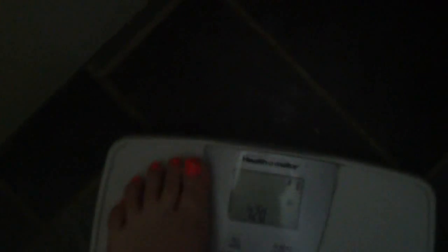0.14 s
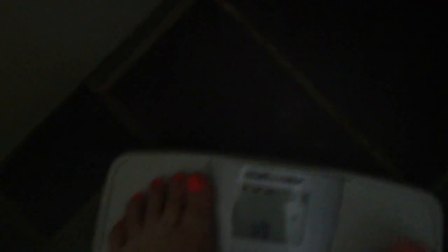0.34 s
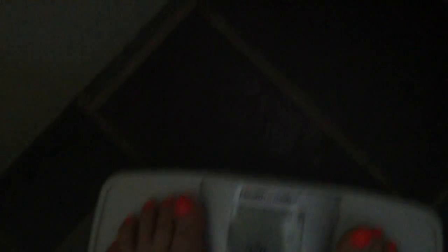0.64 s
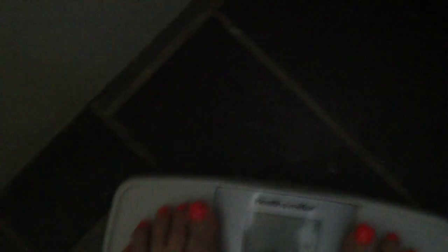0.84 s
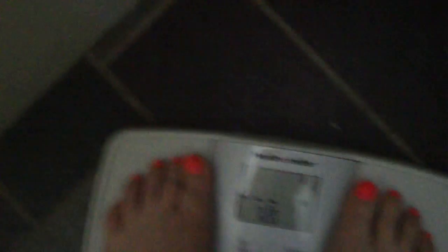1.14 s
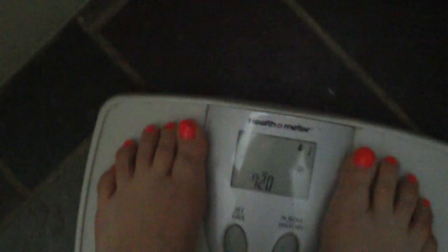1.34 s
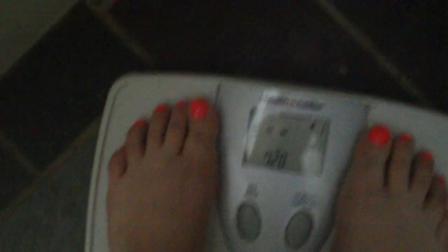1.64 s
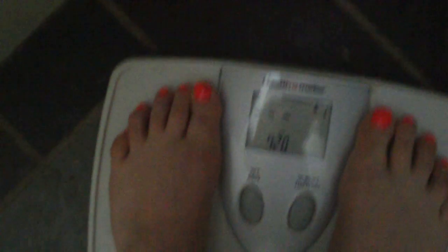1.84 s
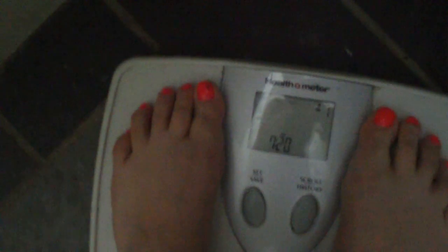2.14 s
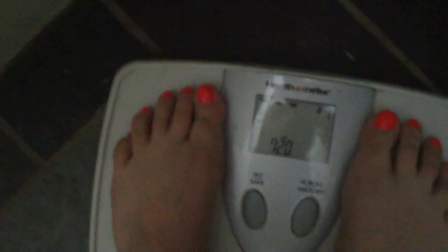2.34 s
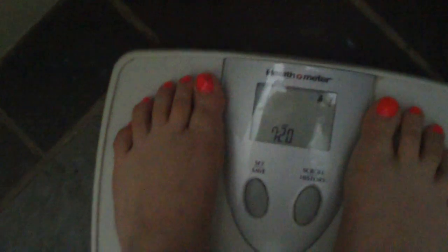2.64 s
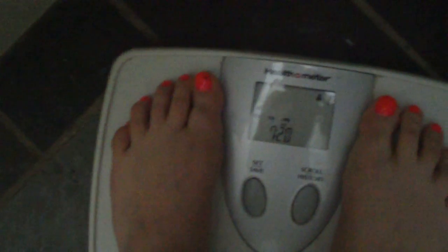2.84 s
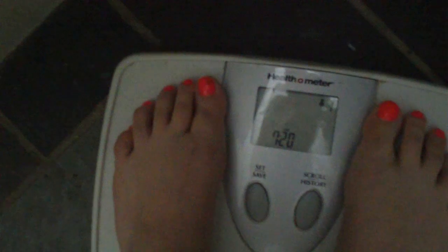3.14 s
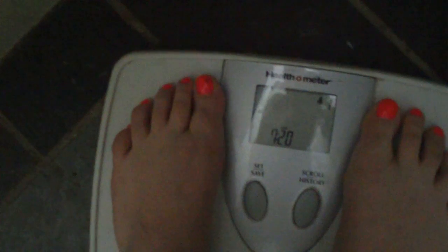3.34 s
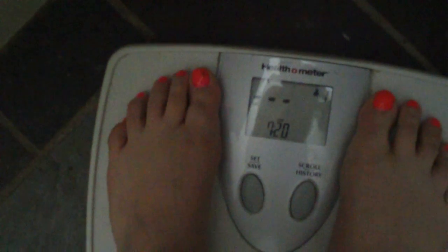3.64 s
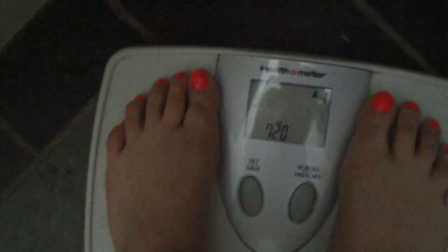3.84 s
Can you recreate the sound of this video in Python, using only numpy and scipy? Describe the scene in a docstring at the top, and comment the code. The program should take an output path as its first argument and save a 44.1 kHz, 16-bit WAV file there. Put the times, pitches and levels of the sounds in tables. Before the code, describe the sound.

A plastic bathroom scale on tiles clunks and clicks as bare feet step on: dull heel thuds at the start, a dense rattle from 0.2 to 0.45 s, a short sole scuff near 0.6, separate clicks around 0.85 and 1.0, loudest clacks at 1.2. A soft thud follows at 1.9, then barely audible blips at 2.8 and 3.5 over steady hiss, faint hum and thin electronic buzz, with short hard-room echo.

```python
"""Throughout: a quiet hard room; a handheld camera adds noise hiss, hand rumble, sine whistles, chatter. 0 to
1.3 s: bare feet step onto a plastic bathroom scale on tiles. Noise bursts ring the platform's modes as clicks
and clunks, grainy noise swells as the soles scuff, sagging sines are heel thuds. 1.9 s: a last thud. 2.8 and
3.5 s: faint short sine tones. Sparse random taps echo the steps, thuds and tones, but not the background."""
import sys
import numpy as np
from scipy import signal
from scipy.fft import rfft, irfft
from scipy.io import wavfile
from scipy.ndimage import uniform_filter1d

SR = 44100
rng = np.random.default_rng(int(sys.argv[2]) if len(sys.argv) > 2 else 0)


def store_wav(level_fs):
    """Save 16-bit WAV to argv[1]."""
    pcm = np.round(np.clip(np.atleast_2d(level_fs), -1, 1) * 32767)
    wavfile.write(sys.argv[1], SR, pcm.T.astype(np.int16))


def undo_db(level):
    """Turn decibels back into plain size, where 20 dB means ten times bigger."""
    steps = np.asarray(level, float) / 20
    return 10 ** steps


N = 176400

# hiss common to both channels, shape only: f/Hz, density/dB per Hz
HISS_SPECTRUM = [(25, -1), (40, -5), (108, -13), (399, -9), (467, -16), (2990, -27), (6540, -34),
                 (8000, -30.5), (12700, -28), (13100, -33.5), (15500, -51)]
# very faint side noise, opposite in the two channels, shape only: f/Hz, density/dB per Hz
SIDE_SPECTRUM = [(20, -5), (100, -8.5), (200, -44), (650, -41), (1900, -35.5), (7200, -34.5), (8000, -38),
                 (10000, -54), (12000, -33.5), (15000, -43)]
HISS_RMS_DB, SIDE_RMS_DB, PATCH_RMS_DB = -53, -65.5, 1.5
# hums of the room: f/Hz, width/Hz, rms level/dB
HUMS = [(143.4, 19, -67.5), (320.6, 41, -62), (406, 17, -67), (727, 18, -71.5), (821, 46, -66.5),
        (7803, 320, -71.5)]
# steady whistles: f/Hz, rms level/dB
WHISTLES = [(7867, -67), (14980, -82)]
RUMBLE_HZ, RUMBLE_WIDTH_HZ, RUMBLE_RMS_DB = 13, 12, -51

# periodic circuit tasks: rate/Hz, first start t/s
TASKS = [(100.012, .0035), (46.863, .0150), (14.989, .0050), (14.989, .0185), (29.97, .0180)]
# load burst of each task in turn: length/s, level before random spread/dB
TASK_BURSTS = [(0.0014, 17), (0.011, 12), (0.0034, 14), (0.0052, 1), (0.0018, 18)]
# resonances that colour the chatter: f/Hz, width/Hz, relative level/dB
CHATTER_MODES = [(5140, 410, -4), (8790, 230, 4), (9800, 1470, 1.5), (10420, 720, 3.5), (10950, 270, -0.5)]
TICK_HZ, TICK_DB, IDLE_DB, CHATTER_RMS_DB = 1000, 1, -1, -58

# decay of the room: f/Hz, t60/s
ROOM_T60 = [(530, 0.63), (1390, 0.43), (3680, 0.27), (9700, 0.24)]
ROOM_DB, ROOM_TURN_S = -10, 0.04954

# faint short tones: t/s, level/dB, f/Hz, t60/s
CHIRPS = [(2.845, -56, 5750, .08), (3.508, -59, 2950, .45)]
# heel thuds through the floor: t/s, level/dB, final f/Hz, t60/s
THUDS = [(0.066, -34, 65, 0.21), (0.075, -29, 177.4, 0.095), (.088, -35.5, 86.3, .15),
         (0.103, -32, 132, 0.11), (0.665, -32.5, 143, 0.11), (1.932, -33.5, 61, 0.049)]
THUD_DROP = 0.26  # share by which the pitch starts high

# soles sliding: three corner times of the swell t/s (the last row's are out of order),
# hiss level/dB, platform body level/dB
SCUFFS = [(0.055, 0.06, .13, -46, -60), (.19, 0.278, 0.54, -58, -57), (0.386, 0.465, 0.58, -42, -50.5),
          (0.54, 0.579, 0.63, -38, -57), (.64, 0.712, 1, -59.5, -65), (1.09, 1.073, 1.1, -48, -68)]
# friction hiss, shape only: f/Hz, density/dB per Hz
SCUFF_SPECTRUM = [(700, 4.5), (1500, 8.5), (8800, 2), (13000, 2.5), (15500, -12)]
SCUFF_GRAIN_RMS_DB = 2

# platform clicks: t/s, middle level/dB, bass level/dB, treble level/dB,
# middle and treble rattle t60/s, favoured mode f/Hz
CLICKS = [(0.0, -30, -24, -34.5, 0.03, 2110), (0.045, -31.5, -42, -31, 0.037, 2630),
          (0.187, -29.5, -29, -40, 0.032, 2720), (0.2408, -31.5, -34, -32.5, 0.027, 3460),
          (0.2631, -39, -32.5, -45, 0.048, 2200), (0.2843, -48, -37, -58, 0.035, 2000),
          (0.2992, -29.5, -33.5, -33.5, 0.037, 1900), (0.3354, -28.5, -38, -13, 0.024, 4340),
          (0.356, -27.5, -26, -28, 0.043, 2130), (0.3693, -22.5, -35, -18, 0.032, 2070),
          (0.4342, -35, -38.5, -48, 0.026, 2010), (0.601, -35.5, -33.5, -48, 0.025, 2940),
          (0.633, -53, -46, -47, 0.051, 4000), (0.6655, -70, -32.5, -60, 0.027, 1700),
          (0.728, -44.5, -35.5, -46, 0.036, 3050), (0.737, -39.5, -36, -47, 0.024, 2100),
          (0.851, -23.5, -28.5, -28, 0.03, 2930), (0.984, -31.5, -32.5, -33, 0.029, 2150),
          (0.9901, -32.5, -31, -41, 0.012, 2160), (1.0164, -30, -40, -37, 0.025, 2920),
          (1.0729, -23.5, -38, -21, 0.038, 4750), (1.2054, -17, -24.5, -22, 0.018, 3520),
          (1.2085, -29.5, -28.5, -31, 0.03, 1940), (1.221, -63, -44, -35, 0.038, 1430),
          (1.2317, -21, -26, -22.5, 0.024, 2050)]
# modes of the platform: f/Hz, width/Hz, relative level/dB
BASS_MODES = [(180, 360, -21), (328, 205, 2), (441.4, 61, 3.5), (520, 35, -0.5), (840, 182, -5),
              (1100, 320, -6.5)]
MID_MODES = [(1500, 270, 0.43), (1857, 180, 8.3), (2150, 280, 7.7), (2674, 410, 7.6), (3300, 1030, 6),
             (3950, 690, 6.5)]
TOP_MODES = [(4720, 1470, 0), (6870, 2050, 0), (9030, 2100, 1.5), (11330, 2500, 0), (12850, 2200, -2.5)]
RISE_S, BASS_RISE_S, BASS_T60_RATIO, BASS_TOP_HZ = 0.001228, 0.0017, 2.8, 1880
MID_KNOCK, BASS_KNOCK = 2.9, 16.3  # first contact against the full rattle
FAVOUR_DB, FAVOUR_OCTAVES = 5, 0.23  # the struck spot lifts the modes near its own

# steady offset, one row per channel: offset/full scale
OFFSET = [
    [-.0237],
    [.0277],
]
EDGE_HZ, GATE_RMS_DB, LOUD_EDGE_DB = 15040, -62, -6


def unit_rms(x):
    """Scales to rms 1."""
    return x / np.sqrt(np.mean(x ** 2) + 1e-20)


def read(points, hz):
    """Reads a table on a log-frequency axis."""
    f, value = np.transpose(points)
    return np.interp(np.log(hz + 1), np.log(f + 1), value)


def add(mix, start_s, sound):
    """Adds a sound at a time."""
    part = mix[max(round(start_s * SR), 0):][:len(sound)]
    part += sound[:len(part)]


def ring(x, modes):
    """Sum of two-pole resonances of alternating sign."""
    out = 0
    for k, (hz, width_hz, db) in enumerate(modes):
        b, a = signal.iirpeak(hz, hz / width_hz, SR)
        out = out + (-1) ** k * undo_db(db) * signal.lfilter(b, a, x)
    return out


def coloured_noise(db):
    """Gaussian noise from a bins x frames field of dB, by inverse STFT."""
    bins, frames = db.shape
    re, im = rng.standard_normal((frames, bins, 2)).T
    size = 2 * bins - 2
    return signal.istft((re + 1j * im) * undo_db(db), nperseg=size, noverlap=size * 3 // 4)[1][:N]


def hiss_and_side_noise():
    """Two noises whose levels share patches in time and frequency; returns mid and side."""
    hz, frames = np.fft.rfftfreq(2048, 1 / SR), N // 512 + 5
    patches = rng.standard_normal((frames, len(hz))).T
    patches = uniform_filter1d(patches, size=14, axis=0)
    patches = PATCH_RMS_DB * unit_rms(uniform_filter1d(patches, size=6, axis=1))
    hiss = coloured_noise(read(HISS_SPECTRUM, hz)[:, None] + patches)
    side = coloured_noise(read(SIDE_SPECTRUM, hz)[:, None] + patches)
    return undo_db(HISS_RMS_DB) * hiss / np.std(hiss), undo_db(SIDE_RMS_DB) * unit_rms(side)


def hums():
    """Fuzzy hums: noise through each resonance twice."""
    noise, out = rng.standard_normal(N), 0
    for hz, width_hz, db in HUMS:
        mode = [(hz, width_hz, 0)]
        out = out + undo_db(db) * unit_rms(ring(ring(noise, mode), mode))
    return out


def whistles():
    """Steady sines."""
    t = np.arange(N) / SR
    return sum(undo_db(db) * np.sqrt(2) * np.sin(2 * np.pi * hz * t) for hz, db in WHISTLES)


def hand_rumble():
    """Noise through one very low resonance."""
    noise = rng.standard_normal(N)
    return undo_db(RUMBLE_RMS_DB) * unit_rms(ring(noise, [(RUMBLE_HZ, RUMBLE_WIDTH_HZ, 0)]))


def chatter():
    """Circuit load leaks in: a tick every millisecond and noisy bursts while periodic tasks run."""
    t = np.arange(N) / SR
    load = undo_db(IDLE_DB) ** 2 + np.zeros(N)
    for (rate_hz, start_s), (length_s, db) in zip(TASKS, TASK_BURSTS):
        turns = (t - start_s) * rate_hz
        run_db = db + rng.uniform(-4.8, 3, round(5 * rate_hz))  # each run differs
        size = undo_db(run_db)[np.floor(turns).astype(int) + 1]
        load += size ** 2 * (turns % 1 < length_s * rate_hz)
    ticks = np.diff(np.floor(t * TICK_HZ), prepend=0) * np.sqrt(SR / TICK_HZ)  # rms 1
    drive = np.sqrt(load) * rng.standard_normal(N) + undo_db(TICK_DB) * ticks
    return undo_db(CHATTER_RMS_DB) * unit_rms(ring(drive, CHATTER_MODES))


def room(x):
    """Sparse random taps, each band dying at its own speed.
    Three fixed tails are fed in steady rotation, so successive echoes differ in pattern."""
    out, at = 0, np.arange(200, SR // 2 - 20, 20)
    turn = np.arange(N) / SR / ROOM_TURN_S
    for k in range(3):
        taps = np.zeros(SR // 2)
        taps[at + rng.integers(0, 20, len(at))] = rng.choice([-1., 1.], len(at))
        hz, t, z = signal.stft(taps, SR, nperseg=256)
        decay_db = -60 * t / read(ROOM_T60, hz)[:, None]
        tail = signal.istft(z * undo_db(decay_db), SR, nperseg=256)[1]
        feed = np.sqrt(2 / 3) * np.cos(np.pi * (turn + k) / 3)  # squares of the three sum to 1
        out = out + signal.fftconvolve(x * feed, tail / np.linalg.norm(tail))[:N]
    return undo_db(ROOM_DB) * out


def dying_tone(db, hz, t60_s, drop=0):
    """Soft-edged decaying sine; its pitch starts high by the share drop and sags to hz."""
    t = np.arange(0, .25, 1 / SR)
    turns = np.cumsum(hz * (1 + drop * np.exp(-t / 0.011))) / SR
    return undo_db(db - 60 * t / t60_s) * (1 - np.exp(-t / 0.007)) * np.sin(2 * np.pi * turns)


def chirp(db, hz, t60_s):
    """Faint short tone of steady pitch."""
    return dying_tone(db, hz, t60_s)


def thud(db, hz, t60_s):
    """Heel thud through the floor: a low tone of sagging pitch."""
    return dying_tone(db, hz, t60_s, THUD_DROP)


def scuffs():
    """Grainy friction hiss in swells, part of it through the platform's modes."""
    t, hz = np.arange(N) / SR, np.fft.rfftfreq(256, 1 / SR)
    grain = uniform_filter1d(rng.exponential(1, N) ** 2 - 2, size=70)  # zero mean
    grain = undo_db(SCUFF_GRAIN_RMS_DB * unit_rms(grain))
    friction = coloured_noise(read(SCUFF_SPECTRUM, hz)[:, None] + np.zeros(N // 64 + 5))
    friction = unit_rms(grain * friction)
    body = unit_rms(ring(grain ** 2 * rng.standard_normal(N), BASS_MODES + MID_MODES))
    out = 0
    for *corners_s, hiss_db, body_db in SCUFFS:
        swell = np.interp(t, corners_s, [0, 1, 0]) ** 1.27
        out = out + swell * (undo_db(hiss_db) * friction + undo_db(body_db) * body)
    return out


def rattle(noise, shape, count=6):
    """Noise burst under the given shape, its spectrum evened so that only the modes colour it."""
    for _ in range(count):
        z = rfft(shape * np.sign(noise))
        noise = irfft(z / (abs(z) + 1e-20), len(shape))
    return shape * np.sign(noise)


def click(mid_db, bass_db, top_db, t60_s, spot_hz):
    """One contact and a short rattle of noise ring the three groups of platform modes."""
    t = np.arange(0, .12, 1 / SR)
    noise, out = rng.standard_normal(len(t)), 0
    mids = []
    for hz, width_hz, db in MID_MODES:
        octaves = np.log2(hz / spot_hz)
        mids.append((hz, width_hz, db + FAVOUR_DB * np.exp(-(octaves / FAVOUR_OCTAVES) ** 2)))
    groups = ((mids, mid_db, RISE_S, 1, MID_KNOCK),
              (TOP_MODES, top_db, RISE_S, 1, 0),
              (BASS_MODES, bass_db, BASS_RISE_S, BASS_T60_RATIO, BASS_KNOCK))
    for modes, db, rise_s, t60_ratio, knock in groups:
        shape = np.minimum(t / rise_s, 1) ** 2 * undo_db(-60 * t / (abs(t60_s) * t60_ratio))
        drive = rattle(noise, shape)
        drive[round(RISE_S * SR)] += knock
        b, a = signal.butter(2, 0.68 * modes[0][0], "high", fs=SR)
        part = signal.lfilter(b, a, ring(drive, modes))
        if modes is BASS_MODES:
            part = signal.lfilter(*signal.butter(2, BASS_TOP_HZ, fs=SR), part)
        peak = np.sqrt(2 * uniform_filter1d(part ** 2, size=130).max())  # of the 3 ms power
        out = out + undo_db(db) * part / peak
    return out


def scene():
    """Feet on the scale and faint tones in the room, over the background; two channels."""
    dry_mix = scuffs()
    for sound, events in ((click, CLICKS), (thud, THUDS), (chirp, CHIRPS)):
        for start_s, *settings in events:
            add(dry_mix, start_s, sound(*settings))
    mid, side = hiss_and_side_noise()
    mid = mid + hums() + whistles() + hand_rumble() + chatter()
    mid = mid + dry_mix + room(dry_mix)
    return np.array([mid + side, mid - side])


def top_cut(x):
    """Nothing passes above the cut-off."""
    return signal.sosfilt(signal.butter(12, 16100, fs=SR, output="sos"), x)


def record(dry):
    """The top of the band passes, reduced, only when loud; each channel gets a steady offset."""
    lowpass = signal.firwin(2047, EDGE_HZ, window=("kaiser", 9), fs=SR)
    low = signal.oaconvolve(dry, lowpass[None], "same")
    top = dry - low
    loud = uniform_filter1d(top[0] ** 2, size=256) > undo_db(GATE_RMS_DB) ** 2
    gate = undo_db(LOUD_EDGE_DB) * uniform_filter1d(1. * loud, size=256)
    return top_cut(low + gate * top + OFFSET)


dry = scene()
out = record(dry)
store_wav(out)
```